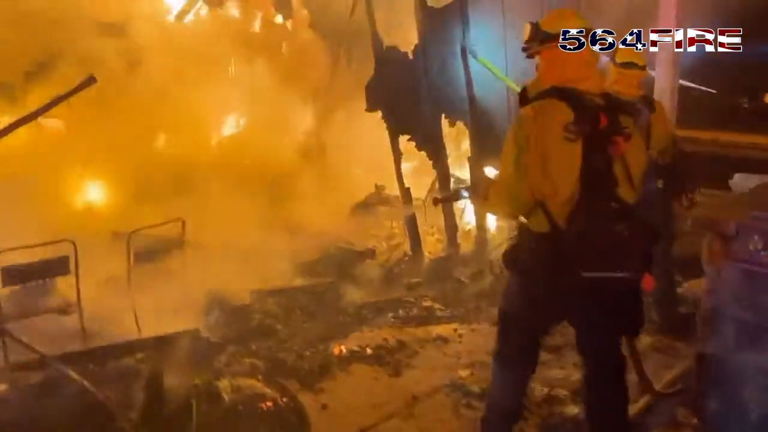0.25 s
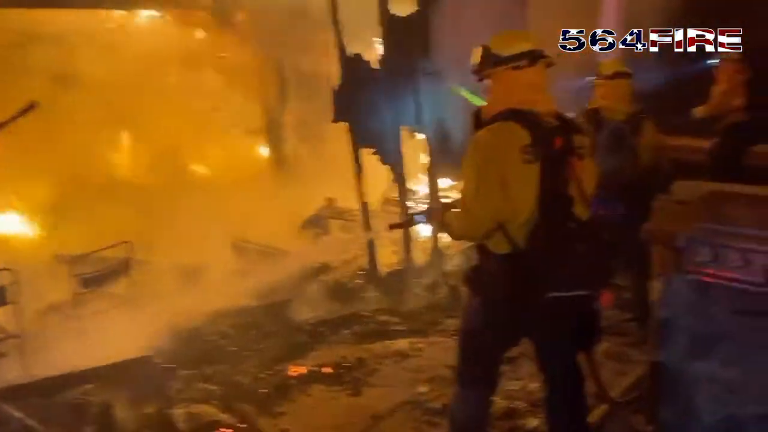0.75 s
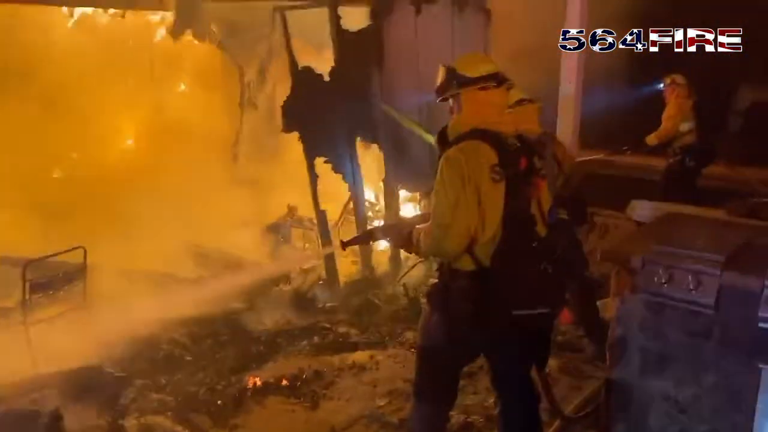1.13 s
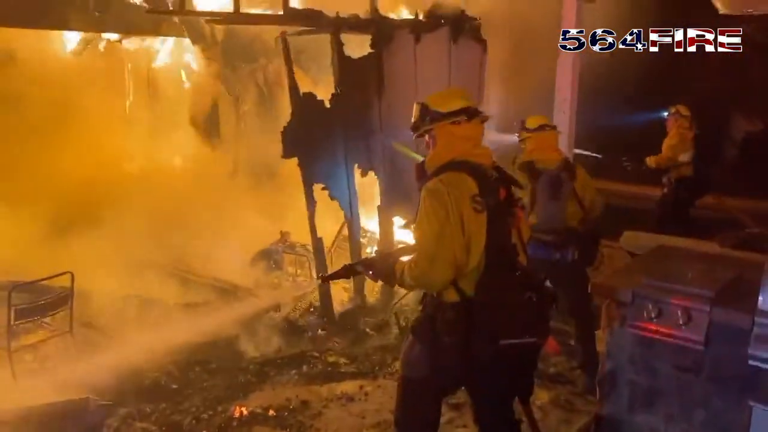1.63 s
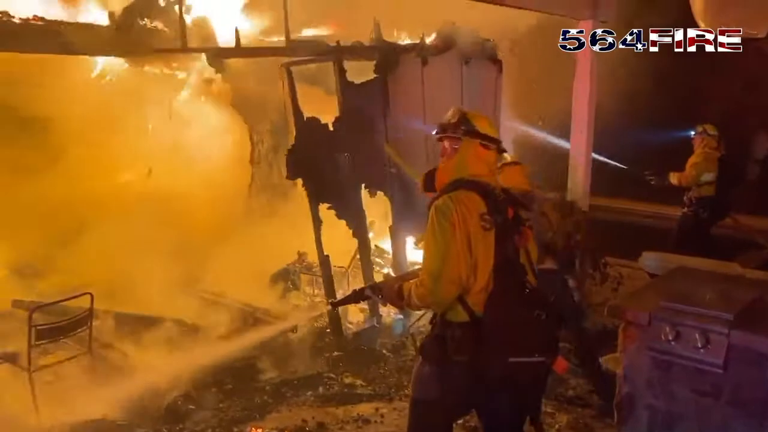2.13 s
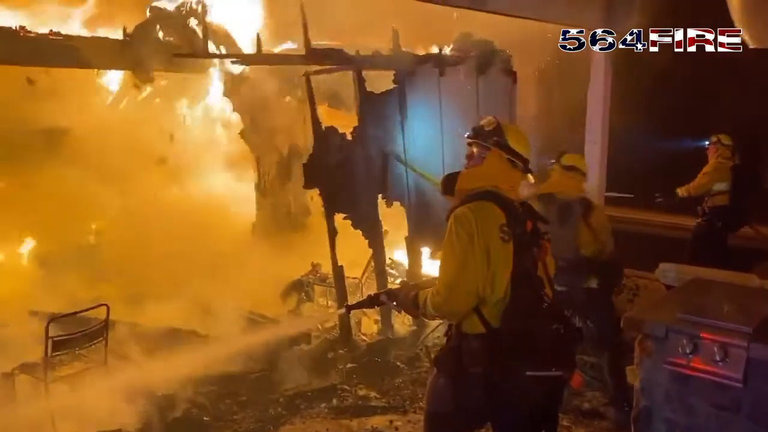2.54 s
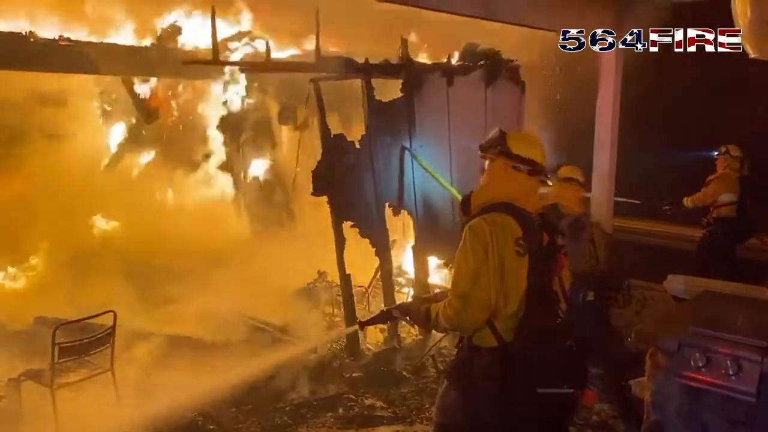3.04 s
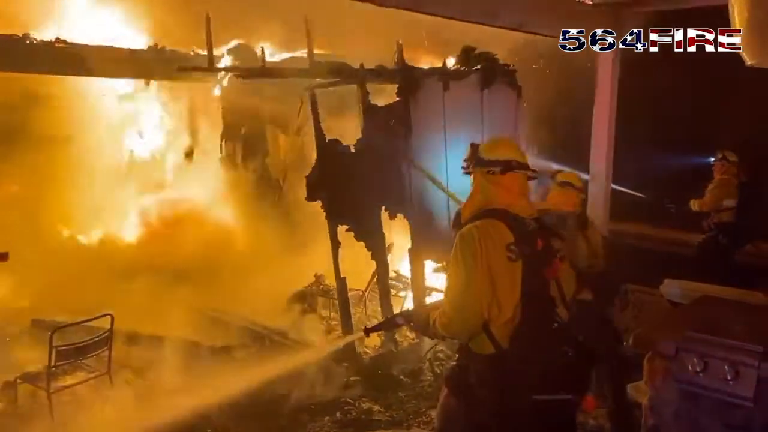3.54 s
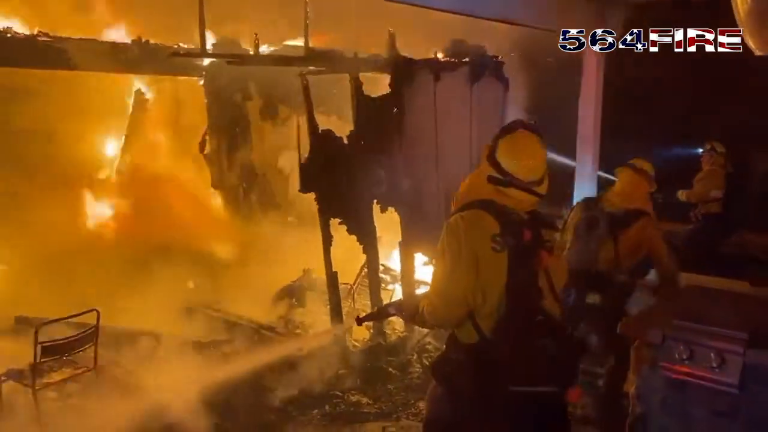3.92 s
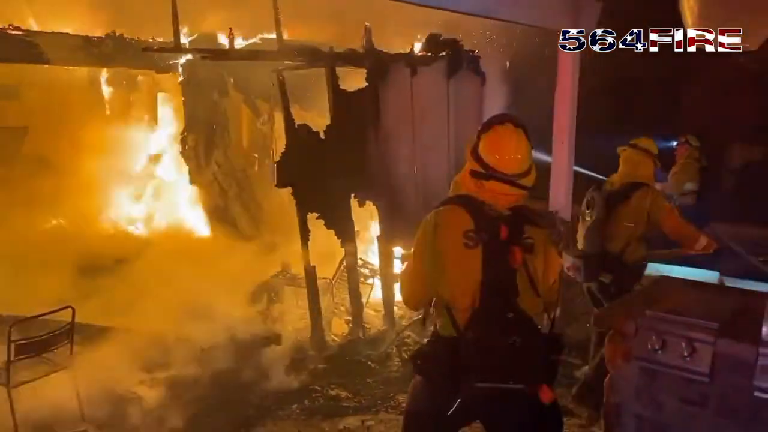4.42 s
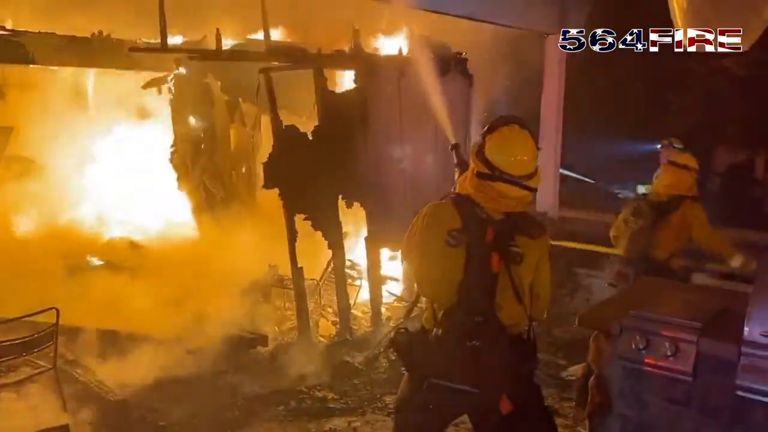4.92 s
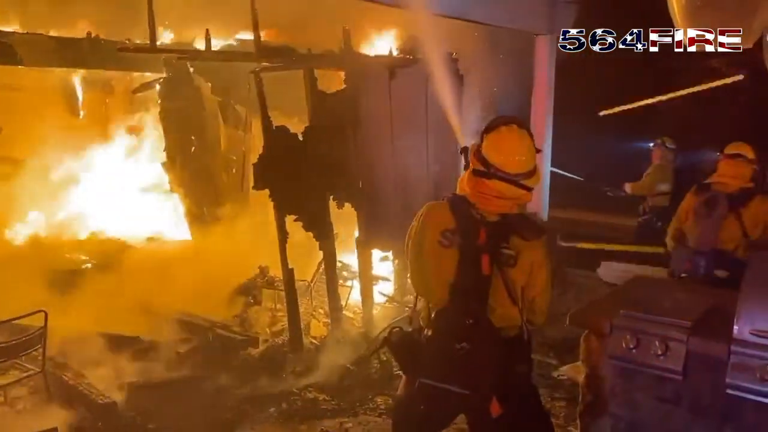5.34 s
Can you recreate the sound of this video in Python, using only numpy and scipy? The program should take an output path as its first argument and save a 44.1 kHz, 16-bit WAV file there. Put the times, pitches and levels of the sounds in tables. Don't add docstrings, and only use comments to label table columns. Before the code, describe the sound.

Surging water spray sweeps across a burning structure at night, over deep fire roar, wood pops, clattering pump engine and a faint truck hum.

```python
import sys
import numpy as np
from scipy import signal
from scipy.fft import rfft, irfft, next_fast_len
from scipy.io import wavfile
from scipy.ndimage import uniform_filter1d, map_coordinates

SR = 44100
rng = np.random.default_rng(int(sys.argv[2]) if len(sys.argv) > 2 else 0)


def digitize_waveform(pressure):
    field = np.atleast_2d(pressure).T
    bounded = np.clip(field, -1, 1)
    quanta = np.round(bounded * 32767).astype(np.int16)
    wavfile.write(sys.argv[1], SR, quanta)


def gain_from_db(level_db):
    decades = np.asarray(level_db, float) / 20
    return 10 ** decades


N = 246078
TIME = np.arange(N) / SR


def unit(x):
    return x / np.sqrt(np.mean(x ** 2) + 1e-20)


def curves(rows):
    s, *cols = np.transpose(rows)
    return [np.interp(TIME, s, c) for c in cols]


def wobble(rate):
    knots = rng.standard_normal(int(N * rate / SR) + 4)
    return map_coordinates(knots, [TIME * rate])


def bumps(rows):
    return sum(db * np.exp(-((TIME - s) / length) ** 2) for s, length, db in rows)


def between(start, end, changeover):
    inside = np.minimum(TIME - start, end - TIME)
    return np.clip(inside / changeover + .5, 0, 1)


def coloured(x, spectrum):
    m = next_fast_len(N + 8192)
    f, db = np.transpose(spectrum)
    hz = np.fft.rfftfreq(m, 1 / SR) + 1
    gain = gain_from_db(np.interp(np.log(hz), np.log(f), db, -120, -120))
    return unit(irfft(rfft(x, m) * gain, m)[:N])


def rush(patchy_db):
    z = signal.stft(rng.standard_normal(N), nperseg=512)[2]
    field = uniform_filter1d(rng.standard_normal(z.shape), size=6, axis=0)
    field = uniform_filter1d(field, size=10, axis=1)
    return unit(signal.istft(z * gain_from_db(patchy_db * unit(field)), nperseg=512)[1][:N])


def droplets(scatter_db, count):
    when, size = rng.random((2, count))
    large = (-np.log(1 - size)).clip(0, 4)
    clicks = rng.choice([-1, 1], count) * gain_from_db(scatter_db * large)
    return unit(np.bincount((when * N).astype(int), clicks, N))


def swells(rows):
    out = np.zeros(N)
    for s, length, hz, width_hz, db in rows:
        half, skirt = width_hz / 2, 3 * width_hz
        narrow = [(max(hz - skirt, 5), -30), (hz - half, -3), (hz, 0), (hz + half, -3), (hz + skirt, -30)]
        shape = np.exp(-((TIME - s) / length) ** 2)
        swell = shape * coloured(rng.standard_normal(N), narrow)
        out += gain_from_db(db) * swell * np.linalg.norm(shape) / np.linalg.norm(swell)
    return out


# time_s, level_db
JET_FORCE = [(0, -31.5), (.75, -31), (1.36, -34), (1.5, -25.5), (2.45, -25), (2.575, -33), (2.63, -34.5),
             (2.88, -38.5), (3.12, -33.5), (3.4, -29.5), (3.65, -22), (3.69, -22), (3.72, -34.5),
             (4.42, -33.5), (4.56, -40), (4.82, -41), (4.828, -35), (5.58, -36.5)]
# start_s, length_s, gain_db
GUSHES = [(.12, 0.071, 1.5), (.2, .025, 1.5), (.5, 0.056, 2.5), (.58, 0.022, -2.5), (.655, 0.023, 2),
          (.7, 0.012, -1), (.86, .05, -1), (1.6, 0.037, 2.5), (1.68, .03, -1.5), (1.75, 0.052, 2.5),
          (1.9, 0.035, 1), (2.0, 0.037, 1.5), (2.1, 0.063, -1.5), (2.23, 0.026, -1.5), (2.28, 0.026, 1.5),
          (2.42, .03, 0.5), (2.545, 0.033, 1.5), (3.47, 0.044, 0), (3.645, 0.032, 3.5), (4.06, 0.026, 4),
          (4.14, 0.057, 2), (4.22, 0.033, 4.5), (4.3, 0.052, 2.5), (4.38, 0.028, -2), (4.49, 0.027, -1.5),
          (4.836, .012, 3), (4.62, .06, -3), (4.76, .05, -2), (4.9, 0.049, 2), (4.98, 0.039, -4)]
# pitch_hz, level_db (per Hz)
NOZZLE = [(3200, -37.5), (3900, -10.5), (4500, -3), (5200, -0.5), (5800, 0), (6700, -3), (7600, -13.5),
          (9000, -13), (9800, -30.5)]
# pitch_hz, level_db (per Hz)
BOARDS = [(1100, -29), (1450, -3.5), (1800, -0.5), (2050, 0.5), (2400, -5), (2900, -11), (3500, -26)]
# pitch_hz, level_db (per Hz)
HOLLOW = [(450, -27.5), (640, -0.5), (900, -1), (1300, -1.5), (1550, -8), (2000, -20)]
# pitch_hz, level_db (per Hz)
SPATTER = [(2200, -26), (2700, -1.5), (3100, -1), (3600, 1), (4100, -3.5), (4800, -24)]
# pitch_hz, level_db (per Hz)
MIST = [(6000, -21), (7400, -1), (8200, -1.5), (9000, -0.5), (9400, -5), (9800, -19.5)]
# start_s, end_s, changeover_s
ON_WALL, ON_HOLLOW, OVERHEAD = (1.44, 2.62, 0.053), (3.5, 3.7, 0.064), (4.824, 6, .008)
HISS_MIX, DRUM_MIX = (-33.5, 1, 0.84, -1, -1.5), (-31.5, 0.53, -1.1, 1.5, 0)
HOLLOW_MIX = (-31, 0.4429, -2.5, 3.5, 1.4)
SPATTER_MIX, MIST_MIX = (-43, 0.79, 7.5, -1.5, 2), (-39, 0.86, -1.6, -11, 9.5)
USUAL_DB = -33
RETREAT_DB_PER_S = -0.86
MIST_HANGS_S = 0.093


def jet():
    change_db = curves(JET_FORCE)[0] + bumps(GUSHES) - USUAL_DB
    aims = [between(*aim) for aim in (ON_WALL, ON_HOLLOW, OVERHEAD)]
    away_db = RETREAT_DB_PER_S * TIME
    surge = 0.2 * wobble(12) + 0.9 * wobble(28) + 0.7 * wobble(55)
    drops = droplets(scatter_db=3.0, count=12000)

    def level(db, follows, *gains_db):
        return db + follows * change_db + sum(g * a for g, a in zip(gains_db, aims))

    def spray(spectrum, share, patchy_db):
        return coloured(rush(patchy_db) + share * drops, spectrum)

    hiss_db = level(*HISS_MIX) + surge
    drum_db = level(*DRUM_MIX) + 0.51 * away_db + 0.73 * surge
    hollow_db = level(*HOLLOW_MIX) + away_db + 0.53 * surge
    spatter_db = level(*SPATTER_MIX) + .6 * away_db + .9 * surge
    settling = np.exp(-TIME[:SR] / MIST_HANGS_S)
    start_db = change_db[0]
    hanging_db = signal.fftconvolve(change_db - start_db, settling / settling.sum())[:N] + start_db
    mist_db = level(*MIST_MIX) + 0.29 * (hanging_db - change_db) + 1.3 * away_db + 0.5 * surge

    out = gain_from_db(hiss_db) * spray(NOZZLE, share=.65, patchy_db=1.3)
    out += gain_from_db(drum_db) * spray(BOARDS, share=.36, patchy_db=1.2)
    out += gain_from_db(hollow_db) * spray(HOLLOW, share=0.34, patchy_db=0.5)
    out += gain_from_db(spatter_db) * spray(SPATTER, share=0.44, patchy_db=0.9)
    out += gain_from_db(mist_db) * spray(MIST, share=0.28, patchy_db=3.5)
    return out


# time_s, level_db
BLAZE = [(0, -26), (.8, -23), (1.3, -24.5), (2.1, -25.5), (2.16, -31.5), (2.75, -31), (3.4, -28.5),
         (3.67, -26.5), (3.86, -31), (4.3, -29), (5.58, -31)]
# start_s, length_s, gain_db
FIREBALLS = [
    (.66, 0.061, 2),
    (.92, 0.03, -4),
    (1.86, 0.27, 2.5),
    (2.3, 0.082, 2),
    (2.74, 0.091, 0.5),
    (2.88, 0.032, -8),
    (3.64, 0.088, 2),
    (5.39, 0.066, 3.5),
]
# pitch_hz, level_db (per Hz)
ROAR = [(15, -37), (30, -19), (48, -3), (65, 0), (110, 1.5), (150, -2), (200, -15), (300, -35.5)]
# pitch_hz, level_db (per Hz)
FLUTTER = [(110, -42), (160, -0.5), (185, 1.5), (208, -5), (260, 0.5), (320, -4), (430, -5.5), (520, -9),
           (700, -19.5)]
# start_s, length_s, pitch_hz, width_hz, level_db
FLARE = [
    (2.946, 0.013, 227, 64, -21),
    (2.955, 0.035, 72, 17, -23.5),
]
# start_s, peak_db, pitch_hz
POPS = [(.41, -15, 1000), (.648, -11, 1900), (.917, -14, 2400), (1.173, -14, 2200), (1.266, -5.5, 1400),
        (2.109, -12, 2000), (3.037, -17, 1950), (3.339, -14, 1770), (3.381, -11, 1860), (3.478, -13, 1450),
        (1.735, -11, 800), (3.4179, -11, 1500), (3.6157, -9, 1200), (3.6748, -14, 1600), (4.194, -14, 2200),
        (4.678, -17, 1500), (4.8435, -12, 1000), (4.881, -14, 1500), (5.009, -15, 850)]
ROAR_DB, ROAR_FOLLOWS = -28, .4


def blaze():
    flutter_db, = curves(BLAZE)
    roar_db = ROAR_DB + ROAR_FOLLOWS * (flutter_db - flutter_db.mean()) + bumps(FIREBALLS)
    out = gain_from_db(roar_db - 0.3) * coloured(rush(patchy_db=0.45), ROAR)
    out += gain_from_db(flutter_db + 0.26 + 0.64 * wobble(10)) * coloured(rush(patchy_db=0.12), FLUTTER)
    out += swells(FLARE)
    t = np.arange(SR // 50) / SR
    decay = gain_from_db(-60 * t / .0026)
    for s, db, hz in POPS:
        out[round(s * SR):][:len(t)] -= gain_from_db(db + 4) * np.sin(2 * np.pi * hz * t) * decay
    return out


# time_s, speed_hz
SHAFT = [(0.0, 28.88), (0.6, 29.93), (1.0, 28.39), (1.4, 29.78), (2.6, 30.57), (3.3, 28.5), (3.8, 30.1),
         (4.3, 28.57), (5.0, 30.74), (5.58, 29.97)]
# multiple of crank speed, level_db
EXHAUST = [(1, -24), (2, 3), (3, -3.5), (4, -4), (5, -5.5), (6, -0.5), (9, -4.5), (10, -7), (14, -11)]
# pitch_hz, level_db (per Hz)
VALVES = [(300, -37), (600, -0.5), (1500, -2), (2900, 0), (3800, -12), (4800, -16.5), (6800, -14),
          (9000, -33.5)]
# start_s, length_s, gain_db
VALVES_SCREENED = [
    (4, 0.27, -12.5),
    (4.85, 0.35, 2),
]
# start_s, length_s, gain_db
EXHAUST_SCREENED = [
    (.75, 0.17, 2.5),
    (1.75, .3, 6.5),
    (2.4, 0.38, -1),
    (3.4, 0.27, -5.5),
    (5.25, 0.15, -8),
]
CRANK_HZ, UNEVEN_CYCLES = 29.84, .045
CLATTER_DB, EXHAUST_DB = -38.5, -33


def pump():
    turns = np.cumsum(curves(SHAFT)[0]) / SR - .09
    clatter_db = CLATTER_DB + bumps(VALVES_SCREENED)
    exhaust_db = EXHAUST_DB + bumps(EXHAUST_SCREENED)
    chug = np.zeros(N)
    for k, db in EXHAUST:
        drift = UNEVEN_CYCLES * np.sqrt(k) * wobble(7)
        cycles = k * CRANK_HZ * TIME + drift + rng.random()
        chug += gain_from_db(db + 2.0 * wobble(5)) * np.sin(2 * np.pi * cycles)
    blow_db = rng.normal(0, 1.1, int(turns[-1]) + 3)[np.floor(turns + 1).astype(int)]
    burst = gain_from_db(blow_db - 39 * (turns % 1))
    burst += .35 * gain_from_db(-30 * ((turns + .5) % 1))
    burst = unit(burst + .4 * gain_from_db(blow_db - 200 * (turns % 1)))
    clatter = burst * coloured(rush(patchy_db=1.5), VALVES)
    return gain_from_db(exhaust_db) * unit(chug) + gain_from_db(clatter_db) * unit(clatter)


# pitch_hz, first_level_db, last_level_db
HUM = [
    (240.1, -36.5, -37.5),
    (528, -58, -42),
]


def truck():
    out = np.zeros(N)
    for hz, first_db, last_db in HUM:
        level_db = first_db + (last_db - first_db) * TIME / TIME[-1] + 2 + 2.9 * wobble(4)
        waver = 0.2 * np.sqrt(hz / HUM[0][0]) * wobble(4)
        out += gain_from_db(level_db) * np.sin(2 * np.pi * (hz * TIME + waver))
    return out


# pitch_hz, level_db (per Hz)
FAR_SPRAY = [(400, -30.5), (700, -4), (2000, -3.5), (3000, -7), (4200, -18), (6500, -14.5), (8900, -11),
             (9800, -31)]


def far_hose():
    return gain_from_db(-40.5 + .6 * wobble(3)) * coloured(rush(patchy_db=0.3), FAR_SPRAY)


# pitch_hz, level_db (per Hz)
AIR = [(8, -10), (20, -8.5), (32, -6), (45, -4.5), (70, -31.5)]


def draught():
    return gain_from_db(-46.0) * coloured(rng.standard_normal(N), AIR)


# start_s, length_s, pitch_hz, width_hz, level_db
PANELS = [
    (1.57, 0.13, 2090, 423, -26.5),
    (1.79, 0.042, 2290, 150, -31),
    (1.962, 0.048, 2160, 200, -30),
    (2.297, 0.1, 2030, 200, -33),
    (3.345, 0.021, 1750, 250, -25.5),
    (3.4, 0.058, 1880, 346, -23.5),
    (3.662, 0.023, 1800, 298, -23),
    (4.145, 0.057, 1640, 246, -31.5),
]


def panels():
    return swells(PANELS)


# start_s, length_s, pitch_hz, width_hz, level_db
SLAPS = [
    (2.95, 0.015, 380, 198, -25.5),
    (3.5, .06, 1670, 500, -28.5),
    (3.59, 0.068, 1270, 350, -27.5),
    (4.86, 0.027, 1400, 1100, -33),
]


def slaps():
    return swells(SLAPS)


def scene():
    water = jet() + far_hose() + panels() + slaps()
    mono = water + blaze() + pump() + truck() + draught()
    return np.tile(mono, (2, 1))


def low_pass(x):
    return signal.sosfilt(signal.butter(12, 10410, fs=SR, output="sos"), x)


def record(dry):
    return low_pass(dry)


dry = scene()
out = record(dry)
digitize_waveform(out)
```